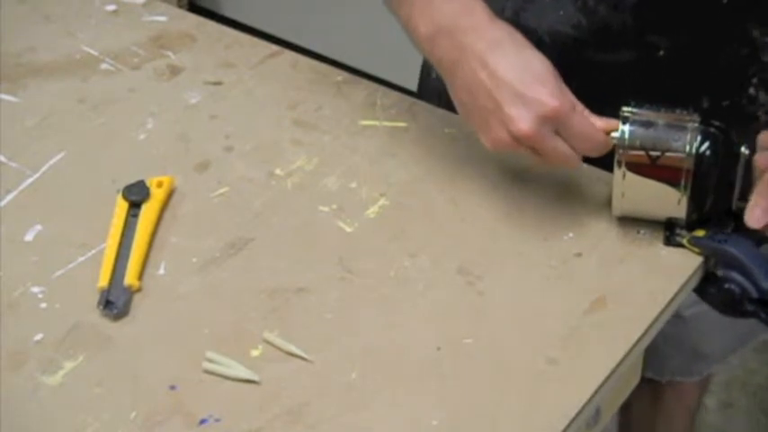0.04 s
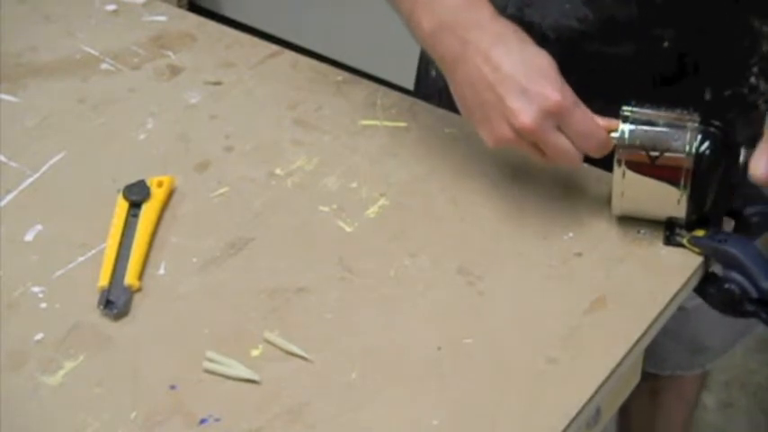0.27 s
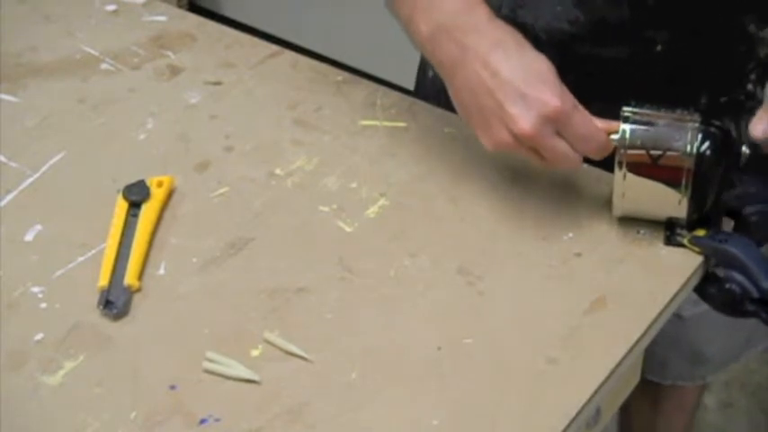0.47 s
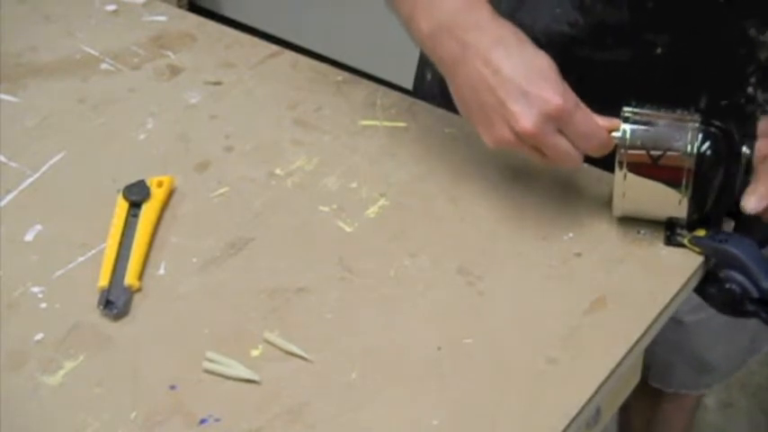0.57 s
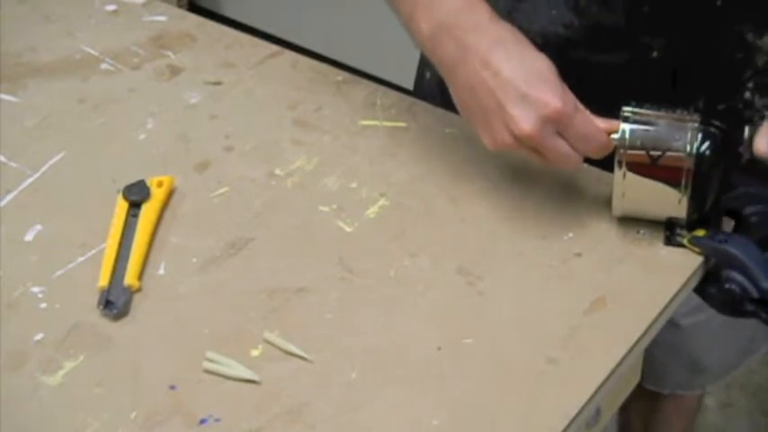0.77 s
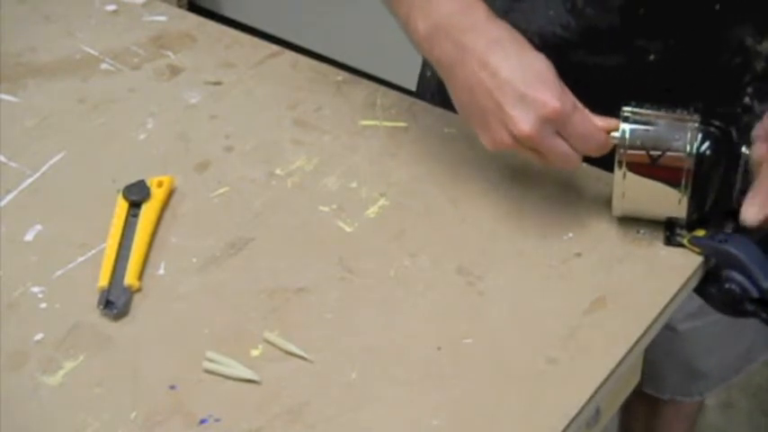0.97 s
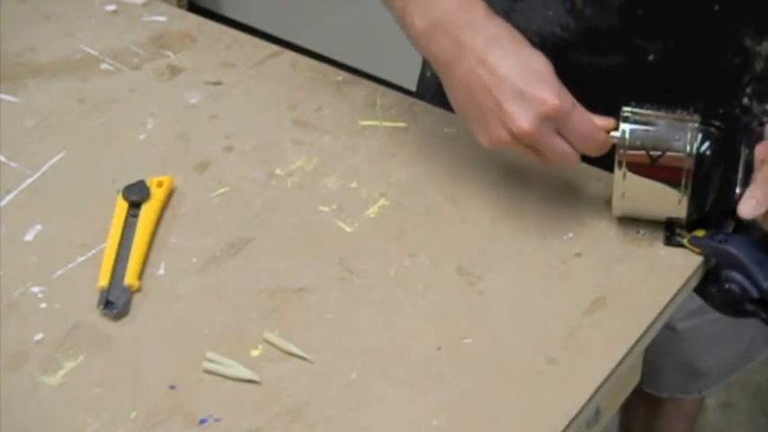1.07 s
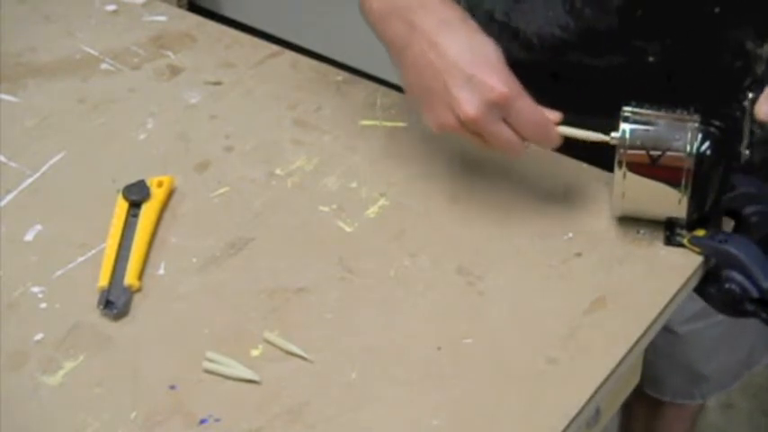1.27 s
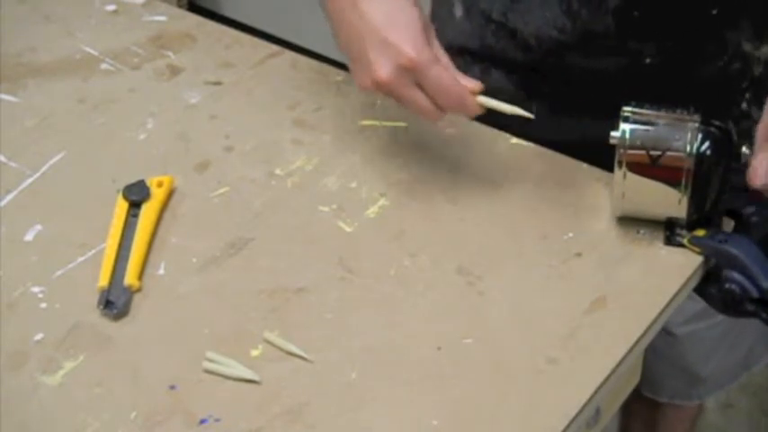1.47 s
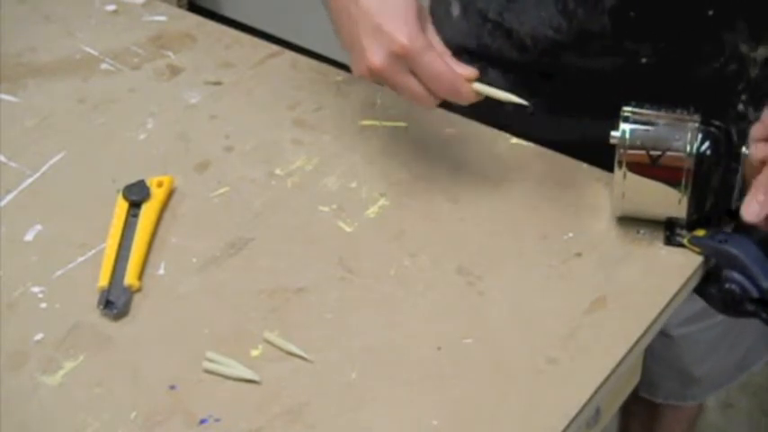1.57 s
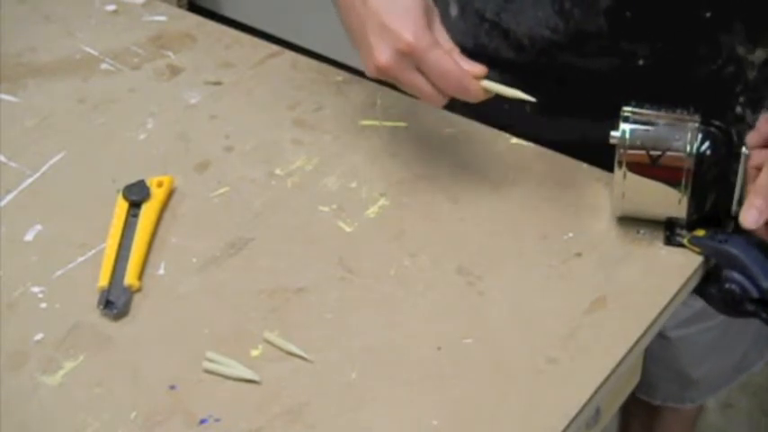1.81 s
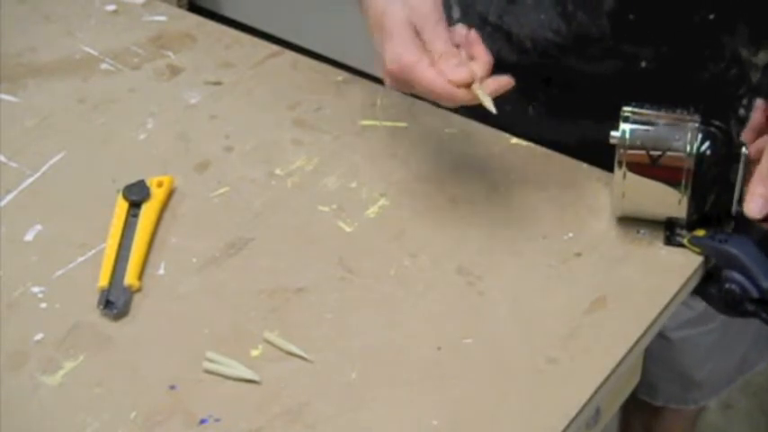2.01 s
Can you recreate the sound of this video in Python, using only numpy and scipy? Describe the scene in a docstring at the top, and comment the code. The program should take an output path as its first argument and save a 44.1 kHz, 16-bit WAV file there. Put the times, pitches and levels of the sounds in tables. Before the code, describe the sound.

In a quiet workshop, a bench-mounted crank sharpener rasps through wood and rumbles the bench. Sharp knocks, scrapes and tiny squeaks follow as the dowel slides out, ending in a brief hollow rattle over faint room hum.

```python
"""In a quiet workshop, a wooden dowel is ground in a hand-cranked sharpener on a workbench.
The cutter tears dense fibres, a train of random impulses that sets the housing ringing, while the
gears drive the low modes of the bench. Worked loose, the dowel knocks, squeaks and scrapes in the
metal clamp by impact and stick-slip friction. The empty housing rings hollow as the mechanism
rattles to rest over faint room noise and hum."""
import sys
import numpy as np
from scipy import signal
from scipy.fft import rfft, irfft, next_fast_len
from scipy.io import wavfile

SR = 44100
rng = np.random.default_rng(int(sys.argv[2]) if len(sys.argv) > 2 else 0)


def pcm_store(signal):
    """Save signal as 16-bit PCM."""
    levels = np.round(np.clip(np.atleast_2d(signal), -1, 1) * 32767)
    wavfile.write(sys.argv[1], SR, levels.astype(np.int16).T)


N = 90404
TIME = np.arange(N) / SR

# Levels are relative within each table.
# spectrum of the room noise: (frequency [Hz], level [dB])
AIR_SPECTRUM = [(24, -75.5), (40, -64), (70, -5.5), (142, -17.5), (173, -9), (211, -15), (258, -3),
                (288, -9.5), (410, -6.5), (585, -12), (1020, -14.5), (1550, -23.5), (5490, -22.5),
                (7160, -32.5), (8000, -57), (10400, -56), (17600, -120)]
# partials of the background hum: (frequency [Hz], level [dB])
HUM_PARTIALS = [(253, -60.5), (412, -51.5), (990, -58.5)]
# envelope of the cutter's grinding: (time [s], level [dB])
GRIND_ENVELOPE = [(0.168, -44), (0.206, -19.5), (0.255, -29.5), (0.275, -43), (0.292, -44), (0.302, -26.5),
                  (0.336, -19.5), (0.41, -26.5), (0.435, -32.5), (0.48, -21.5), (0.56, -22.5), (0.66, -22),
                  (0.70, -25), (0.82, -28), (0.96, -31), (1.115, -22), (1.135, -34), (1.2, -48.5),
                  (1.213, -20.5), (1.24, -26.5), (1.26, -29), (1.335, -23.5), (1.37, -30), (1.395, -24.5),
                  (1.485, -32), (1.502, -24), (1.58, -21), (1.615, -33), (1.657, -28), (1.70, -33.5),
                  (1.8, -60)]
# spectrum of the tearing fibres: (frequency [Hz], level [dB])
GRIND_SPECTRUM = [(180, -53.5), (300, -11), (423, -6), (675, -9.5), (925, -2), (1200, -7), (1630, 0),
                  (1940, -9), (4950, -10.5), (6000, -16.5), (6780, -15), (8000, -38.5), (10400, -99),
                  (17600, -120)]
# resonances of the housing: (frequency [Hz], bandwidth [Hz], gain [dB])
HOUSING_MODES = [(752, 6.8, 3.5), (840, 9.3, 8), (947, 56, 8), (1010, 26, -3.5), (1302, 19, 1),
                 (1386, 22, 7.5), (1502, 77, 5.5), (1653, 31, 7), (2907, 26, 9.5), (3360, 66, 1.5),
                 (4130, 39, 7), (4090, 19, 2.5), (4240, 60, 1.5), (5034, 69, 6)]
# added resonances of the empty housing: (frequency [Hz], bandwidth [Hz], gain [dB])
HOLLOW_MODES = [(742, 24, -6.5), (786, 31, 5), (1615, 14, -4), (2890, 25, 7.5)]
# envelope of the gear rumble: (time [s], level [dB])
RUMBLE_ENVELOPE = [(0.17, -58), (0.225, -34.5), (0.29, -45), (0.36, -32.5), (0.48, -32.5), (0.56, -29),
                   (0.66, -33.5), (0.85, -33.5), (1.0, -42.5), (1.09, -31.5), (1.19, -38), (1.5, -40),
                   (1.68, -35), (1.8, -51)]
# resonances of the bench top: (frequency [Hz], bandwidth [Hz], gain [dB])
BENCH_MODES = [(165, 30, -12), (200.4, 16, 8.5), (227, 17, 0), (289, 24, 3.5), (380, 63, 5),
               (424.8, 7.2, 16)]
# impacts in the clamp: (time [s], level [dB], resonance [Hz], resonance gain [dB], decay time [s])
KNOCKS = [(0.200, -26, 2170, 14, 0.0064), (0.447, -19.5, 2450, 7, 0.0077), (0.473, -21, 1680, 3, 0.0049),
          (0.581, -19, 1480, 5, .004), (0.660, -23.5, 784, 15, 0.011), (0.713, -20, 1480, 18, .005),
          (0.891, -11, 3850, 10.5, .005), (0.9195, -9, 2300, 3.5, .004), (0.936, -15, 4200, 17, .004),
          (0.944, -13.5, 4460, 20.5, .003), (0.965, -12.5, 2890, 4.5, .005),
          (0.9795, -13, 2700, 14.5, .003), (0.991, -14, 4100, 15, .006), (1.010, -14, 1800, 12.5, .004),
          (1.0445, -11, 5170, 18, .002), (1.072, -10.5, 4100, 7, .004), (1.095, -21, 5070, 9, .003),
          (1.110, -21.5, 4560, 4, .003), (1.1165, -9.5, 4400, 19, .004), (1.230, -16, 950, 4.5, .004),
          (1.238, -24, 4400, 1.5, .003), (1.299, -16.5, 6900, 2.5, .003), (1.334, -23, 4200, 2.5, .004),
          (1.409, -11.5, 4700, 9.5, .003), (1.428, -12, 4450, 14, .004), (1.44, -13, 3200, 12, .005),
          (1.494, -16.5, 850, 28, .005), (1.512, -13.5, 6000, 9.5, .005), (1.532, -12.5, 1640, 22, .003),
          (1.551, -17.5, 1640, 11, 0.013), (1.640, -24.5, 4300, 11, .008), (1.653, -21, 2900, 8.5, 0.012),
          (1.674, -17, 4340, 13.5, 0.0044)]
# spectrum of the knocks and of the squeaks' rasp: (frequency [Hz], level [dB])
CONTACT_SPECTRUM = [(300, -19.5), (900, 2.5), (2000, 4.5), (4500, 3.5), (5600, -2.5), (7000, -7.5),
                    (8000, -43)]
# squeaks of the sticking dowel: (peak time [s], level [dB], frequency [Hz], Gaussian half length [s])
SQUEAKS = [(0.342, -36, 7030, .01), (0.529, -38, 7100, 0.011), (0.566, -26.5, 6780, 0.013),
           (0.687, -35.5, 6700, .006), (0.756, -36.5, 7060, .015), (0.81, -39, 6440, .025),
           (0.861, -24, 930, 0.009), (0.893, -19, 5950, .002), (0.897, -20, 920, 0.0033),
           (0.985, -20.5, 5060, 0.0061), (1.138, -21.5, 4800, 0.013), (1.190, -13, 4565, 0.0032),
           (1.194, -22, 4670, 0.0075), (1.212, -22, 4700, .003), (1.3023, -12, 4170, 0.0025),
           (1.381, -14, 1443, 0.0012), (1.387, -11.5, 1480, .0025), (1.39, -22.5, 4410, .005),
           (1.485, -29, 5430, .003), (1.518, -15.5, 4480, 0.0036)]
# envelope of the dowel's scraping: (time [s], level [dB])
SCRAPE_ENVELOPE = [(0.88, -17.5), (0.91, -23), (0.99, -15.5), (1.115, -13.5), (1.175, -35), (1.235, -12),
                   (1.28, -44), (1.335, -19), (1.37, -38), (1.395, -13.5), (1.44, -18.5), (1.47, -21.5),
                   (1.57, -19), (1.615, -24.5), (1.655, -23), (1.70, -45), (1.78, -61)]
# spectrum of wood slipping on metal: (frequency [Hz], level [dB])
SCRAPE_SPECTRUM = [(880, -39), (1500, -4), (2200, 4), (2850, 5.5), (3500, 1.5), (4200, 8.5), (5000, 2.5),
                   (5700, -12.5), (6860, -5), (8000, -21.5), (10000, -62)]
# the dowel's resonance, rising briefly, then sinking as it slides out: (time [s], frequency [Hz])
DOWEL_GLIDE = [(0.93, 4500), (1.04, 5400), (1.12, 5000), (1.22, 4600), (1.3, 4150), (1.43, 4400),
               (1.7, 4400)]
# frequency response of the microphone: (frequency [Hz], gain [dB])
MICROPHONE_RESPONSE = [(30, -36), (70, -18.5), (150, -2), (6500, -2.5), (7200, -2.5), (7700, -4),
                       (8200, -30.5)]


def from_db(db):
    """Amplitude ratio: a factor of ten for every 20 dB."""
    return 10 ** (np.asarray(db) / 20)


def unit_rms(x):
    """Normalisation to unit mean power."""
    return x / np.sqrt(np.mean(x ** 2) + 1e-20)


def envelope(rows, fade_s=.02):
    """Gain along a (time [s], level [dB]) curve, with exponential decay beyond its ends."""
    times, db = np.transpose(rows)
    outside_s = np.maximum(times[0] - TIME, 0) + np.maximum(TIME - times[-1], 0)
    return from_db(np.interp(TIME, times, db)) * np.exp(-outside_s / fade_s)


def drift(corner_hz):
    """Random fluctuation: low-pass noise of unit rms."""
    pole = np.exp(-2 * np.pi * corner_hz / SR)
    smoothed = signal.lfilter([1], [1, -2 * pole, pole * pole], rng.standard_normal(2 * N))
    return unit_rms(smoothed[N:])


def colour(x, spectrum):
    """Minimum-phase filtering along a (frequency [Hz], level [dB]) curve."""
    size = 2 * next_fast_len(len(x))
    hz, db = np.transpose(spectrum)
    grid_hz = np.maximum(np.fft.rfftfreq(size, 1 / SR), 1)
    gain = from_db(np.interp(np.log(grid_hz), np.log(hz), db))
    cepstrum = irfft(np.log(gain))
    cepstrum[1:size // 2] *= 2   # folding the cepstrum makes the filter causal
    cepstrum[size // 2 + 1:] = 0
    return irfft(rfft(x, size) * np.exp(rfft(cepstrum)))[:len(x)]


def resonance(x, hz, width_hz):
    """Forced response of a damped oscillator with unit peak gain."""
    radius = np.exp(-np.pi * width_hz / SR)
    feedback = [1, -2 * radius * np.cos(2 * np.pi * hz / SR), radius * radius]
    return signal.lfilter(np.array([1, 0, -1]) * (1 - radius * radius) / 2, feedback, x)


def modal_sum(x, modes):
    """Superposition of modes driven by one force."""
    return sum(from_db(db) * resonance(x, hz, width_hz) for hz, width_hz, db in modes)


def lift(x, hz, width_hz, db):
    """Interference of a resonance with its input raises or lowers one band."""
    return x + (from_db(db) - 1) * resonance(x, hz, width_hz)


def impulses(per_s, spread_db):
    """Shot noise: independent clicks of random size and sign."""
    sizes = from_db(spread_db * np.minimum(rng.exponential(1, N), 4))
    signs = rng.choice([-1, 1], N)
    return sizes * signs * (rng.random(N) < per_s / SR) + 1e-18


def background(wobble_depth=.02086):
    """Stationary room noise and a faint hum that wavers by random frequency modulation."""
    hum = np.zeros(N)
    for hz, db in HUM_PARTIALS:
        phase = 2 * np.pi * hz * np.cumsum(1 + wobble_depth * drift(corner_hz=15)) / SR
        hum += from_db(db) * np.sqrt(2) * np.sin(phase)
    air = unit_rms(colour(rng.standard_normal(N), AIR_SPECTRUM))
    return hum + from_db(-42.5) * air


def grinding(flutter_db=1.28, empty_from_s=1.495):
    """Impulse excitation: tearing fibres ring the housing, which gains hollow modes once empty."""
    fibres = impulses(per_s=9000, spread_db=3.1) * from_db(flutter_db * drift(corner_hz=80))
    cutting = unit_rms(housing(moving_contact(colour(fibres, GRIND_SPECTRUM))))
    emptiness = np.clip((TIME - empty_from_s) / .01, 0, 1)
    hollow = unit_rms(modal_sum(fibres, HOLLOW_MODES)) * emptiness
    return envelope(GRIND_ENVELOPE) * (from_db(-.5) * cutting + from_db(-3.5) * hollow)


def moving_contact(x, swing_db=3):
    """Spectral modulation: the cutter's moving contact favours now one midrange band, now another."""
    for hz in np.geomspace(450, 3400, num=8):
        gain_db = swing_db * np.clip(drift(corner_hz=12), -2, 2)
        x = lift(x, hz, hz / 5, gain_db)
    return x


def housing(x):
    """Resonant filtering: the housing's modes colour the vibration passing through it."""
    for hz, width_hz, db in HOUSING_MODES:
        x = lift(x, hz, width_hz, db)
    return x


def gear_rumble():
    """Structure-borne sound: gear tooth impacts drive the low modes of the bench top."""
    teeth = impulses(per_s=1500, spread_db=3.5)
    low_band = signal.butter(2, [140, 600], "band", fs=SR, output="sos")
    bench = signal.sosfilt(low_band, modal_sum(teeth, BENCH_MODES))
    return from_db(-3) * envelope(RUMBLE_ENVELOPE) * unit_rms(bench)


def reverberation(x, t60_s=.3, delay_s=.007):
    """Diffuse reflections from bench and walls form an exponentially decaying tail."""
    age = TIME[:SR // 2]
    tail = rng.standard_normal(len(age)) * from_db(-60 * age / t60_s) * (age > delay_s)
    tail /= np.sqrt(np.sum(tail ** 2))
    return from_db(-8) * signal.fftconvolve(x, tail)[:N]


def knocks(attack_s=.00036, width_hz=640, gain_db=2):
    """Impact transients: the dowel hits the clamp in noise bursts, each with its own resonance."""
    track, age = np.zeros(N + SR), TIME[:SR // 16]
    for time_s, db, hz, lift_db, decay_s in KNOCKS:
        shape = (1 - np.exp(-age / attack_s)) * np.exp(-age / decay_s)
        shape /= shape.max()
        crunch = colour(rng.choice([-1., 1.], len(age)) * shape, CONTACT_SPECTRUM)
        ringing = housing(lift(crunch, hz, width_hz, lift_db))
        knock = unit_rms(ringing) * np.sqrt(np.mean(shape ** 2))   # keeps the burst's energy
        start = int(time_s * SR)
        track[start:start + len(age)] += from_db(db + gain_db) * knock
    return track[:N]


def squeaks(wobble_depth=.031):
    """Stick-slip oscillation of the dowel gives brief, unsteady tones with a little rasp."""
    track = np.zeros(N)
    pitch_ratio = 1 + wobble_depth * drift(corner_hz=301.5)
    rasp = from_db(-14) * unit_rms(colour(rng.standard_normal(N), CONTACT_SPECTRUM))
    for peak_s, db, hz, half_s in SQUEAKS:
        tone = np.sqrt(2) * np.sin(2 * np.pi * hz * np.cumsum(pitch_ratio) / SR)
        swell = np.exp(-.5 * np.minimum(((TIME - peak_s) / half_s) ** 2, 100))
        track += from_db(db) * swell * (tone + rasp)
    return track


def scraping(flutter_db=2.3):
    """Sliding friction: tiny slips of wood on the clamp's jaws excite both housing and dowel."""
    slips = impulses(per_s=3000, spread_db=3.5) * from_db(flutter_db * drift(corner_hz=97))
    housing_ring = unit_rms(housing(colour(slips, SCRAPE_SPECTRUM)))
    dowel_ring = from_db(-5) * unit_rms(dowel_resonance(slips))
    return from_db(-6) * envelope(SCRAPE_ENVELOPE) * (housing_ring + dowel_ring)


def dowel_resonance(x, half_width_hz=450):
    """A time-varying resonator: the dowel's natural frequency glides as it slides out."""
    centre_hz = np.interp(TIME, *np.transpose(DOWEL_GLIDE))
    carrier = np.exp(2j * np.pi * np.cumsum(centre_hz) / SR)
    pole = np.exp(-2 * np.pi * half_width_hz / SR)
    baseband = signal.lfilter([1], [1, -2 * pole, pole * pole], x / carrier)
    return np.real(carrier * baseband)


def scene():
    """Superposition of sharpener, reverberation and background, alike in both channels."""
    sharpener = grinding() + gear_rumble() + knocks() + squeaks() + scraping()
    return np.tile(sharpener + reverberation(sharpener) + background(), (2, 1))


def record(dry):
    """Band limiting and soft saturation: the microphone rounds tall peaks and cuts the top steeply."""
    peak_limit, cutoff_hz = .75, 8400
    coloured = np.array([colour(channel, MICROPHONE_RESPONSE) for channel in dry])
    rounded = coloured / (1 + (coloured / peak_limit) ** 6) ** (1 / 6)
    low_pass = signal.cheby2(24, 60, cutoff_hz, fs=SR, output="sos")
    return signal.sosfilt(low_pass, rounded)


dry = scene()
out = record(dry)
pcm_store(out)
```